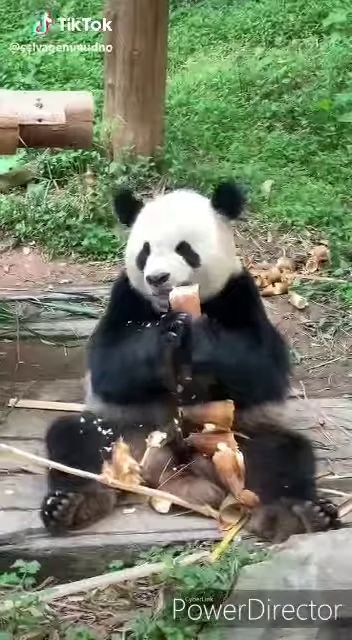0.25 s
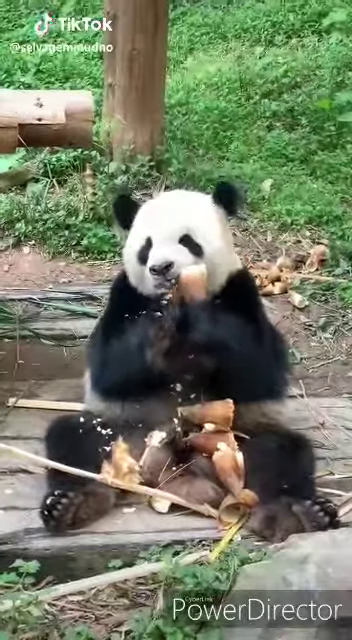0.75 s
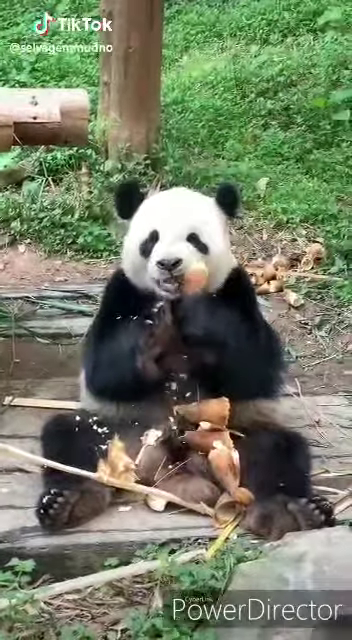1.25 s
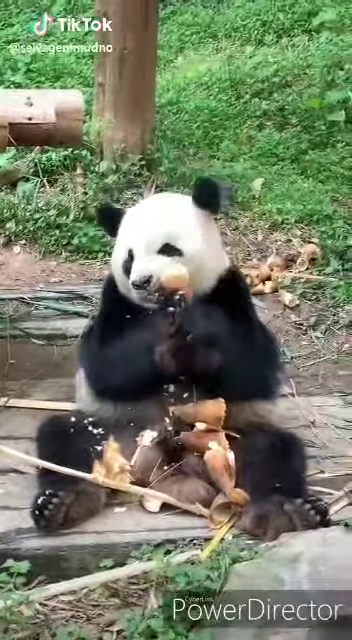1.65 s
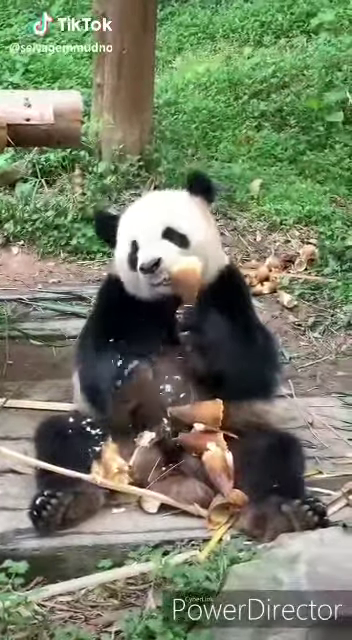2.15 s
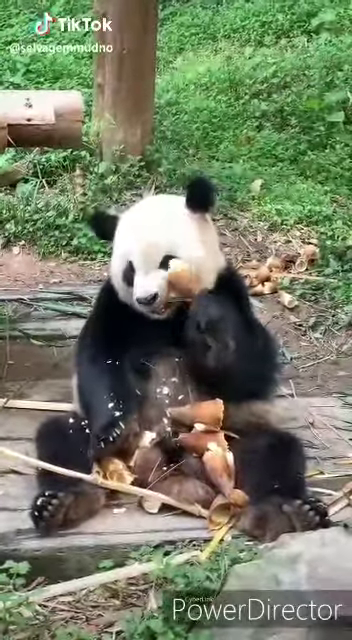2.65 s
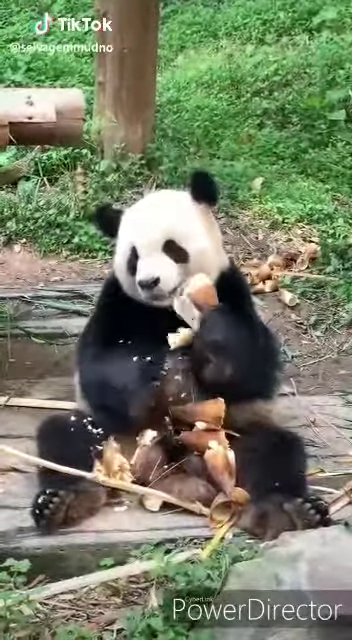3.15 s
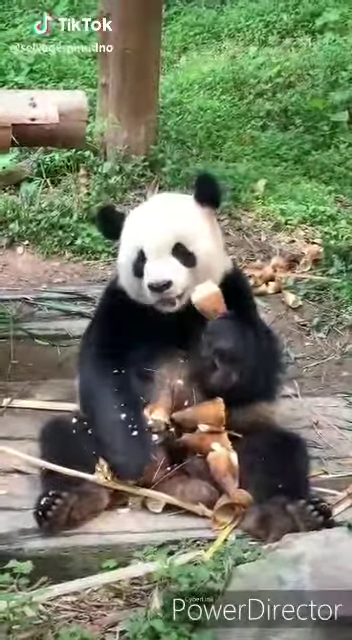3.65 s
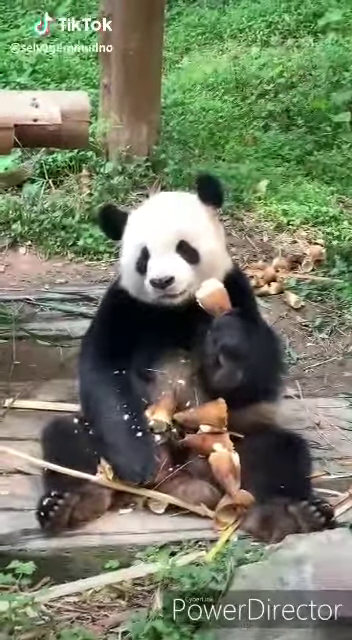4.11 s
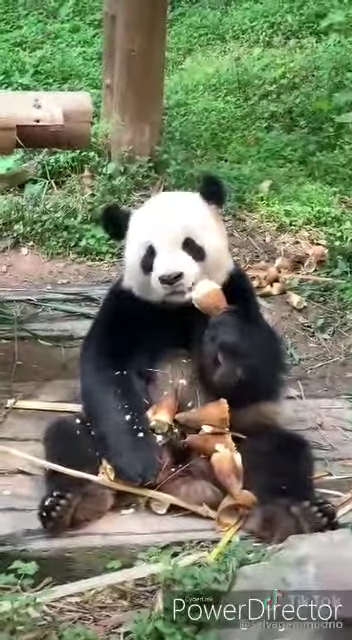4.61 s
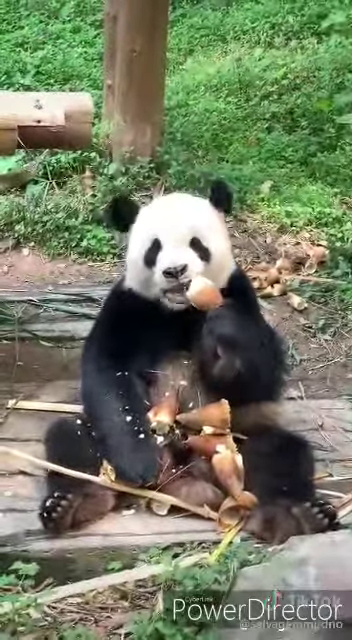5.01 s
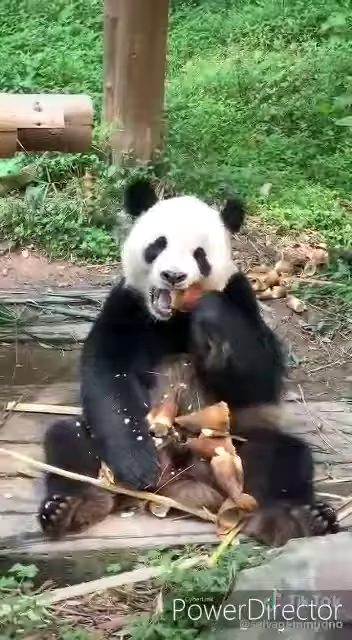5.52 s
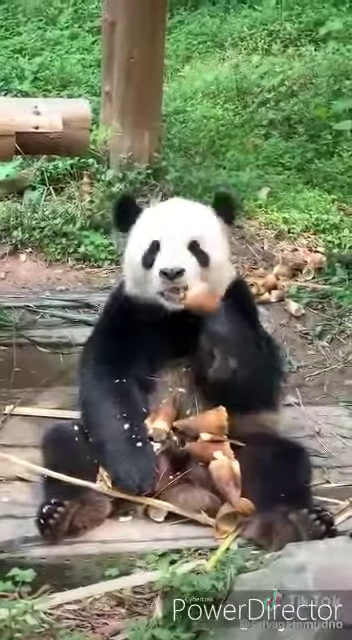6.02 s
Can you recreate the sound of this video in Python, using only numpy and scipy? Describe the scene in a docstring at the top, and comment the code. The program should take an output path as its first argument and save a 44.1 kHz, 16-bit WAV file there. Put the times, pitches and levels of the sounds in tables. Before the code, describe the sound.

Juicy, brittle chewing at about five bites a second, with sudden bright cracks, soft lip smacks and a distant low drone in open air.

```python
"""A panda on a wooden deck outdoors bites a bamboo shoot and chews, about five strokes a second.
Throughout: a far rumble of filtered noise, a wavering sine drone and a faint hiss of open air.
From the start each stroke crushes a swarm of wet fibres, and most come with a wet smack of the mouth.
Bundles snap as short ringing bursts, thickest at 0.1-0.6, 1.9-2.0 and 3.2-3.3 s.
Near 2.6 s the planks boom softly under the animal's weight.
"""
import sys
import numpy as np
from scipy import signal
from scipy.fft import rfft, irfft
from scipy.io import wavfile

SR = 44100
rng = np.random.default_rng(int(sys.argv[2]) if len(sys.argv) > 2 else 0)


def to_wav(sig):
    """Store sig (one row per channel, or 1-D mono) as 16-bit WAV at the path in sys.argv[1].

    Samples outside -1..1 are clipped; the rate is SR.
    """
    pcm = np.clip(np.atleast_2d(sig), -1, 1) * 32767
    pcm = np.round(pcm).astype(np.int16)
    wavfile.write(sys.argv[1], SR, pcm.T)  # frames by channels


N = 276490
TIME_S = np.arange(N) / SR

# Jaw strokes. Each row: start of full pressure in seconds, hold in ms, crunch level in dB,
# brightness in dB per octave, ring of thick fibres in Hz, ring of thin fibres in Hz.
JAW_STROKES = [(0.005, 125, -47, -3.5, 4000, 11100), (0.127, 41, -35, -1.5, 5570, 10500),
               (0.276, 6.1, -45, -8.5, 3640, 9800), (0.343, 48, -58, -12, 5600, 10000),
               (0.541, 31, -34.5, 0, 6100, 10500), (0.753, 42, -45, 0, 5430, 10800),
               (0.957, 1.8, -35.5, 2.5, 4700, 10300), (1.124, 7.5, -59, 3, 4300, 10900),
               (1.16, 59, -55.5, 0, 3380, 10500), (1.367, 40, -52, 5, 6040, 10200),
               (1.595, 61, -53, 0, 4600, 11800), (1.943, 31, -26.5, 2.5, 4800, 11600),
               (2.016, 12.7, -30.5, -2, 3960, 11300), (2.348, 71, -54, 4, 4940, 9900),
               (2.545, 31, -40, 2.5, 5550, 10600), (2.751, 33, -46.5, 3.5, 4800, 10400),
               (2.985, 6.8, -36, 5, 6900, 7700), (3.236, 8.8, -28, 0, 5630, 11900),
               (3.269, 8.8, -33.5, 5, 4800, 11500), (3.452, 44, -35.5, -1.5, 5260, 11600),
               (3.655, 19, -41, -0.5, 5740, 10900), (3.881, 4.8, -24.5, -1.5, 5460, 8500),
               (4.066, 46, -47, -3, 4720, 10800), (4.29, 34, -43.5, -2, 5030, 10600),
               (4.483, 12, -33.5, 6.5, 5700, 10500), (4.698, 37, -41, 3.5, 5300, 10100),
               (4.908, 15, -40.5, 12.5, 5930, 9800), (5.107, 54, -44.5, -0.5, 5060, 10000),
               (5.333, 24, -47.5, -4, 5230, 7700), (5.519, 26, -36, 1.5, 5160, 9800),
               (5.728, 26, -48.5, 5, 5140, 10600), (5.939, 22, -46.5, -2.5, 4800, 10500),
               (6.138, 55, -46, 5, 5600, 10500)]
# Snapping fibre bundles. Each row: time in seconds, snap level in dB, brightness in dB per octave, # ring of
# the bundle in Hz, knock level in dB, knock pitch in Hz. The knock is mostly the shoot's; # the dull knocks
# near 0.42-0.49 s are clacks of the teeth.
BUNDLE_SNAPS = [(0.1222, -18, 5, 11300, -24, 1500), (0.1654, -21, -2, 4500, -35, 950),
                (0.3475, -20.5, 8, 9800, -30.5, 1160), (0.387, -22, -3, 5330, -39, 1080),
                (0.4185, -25, -6, 10300, -16.5, 590), (0.4288, -29, -9, 10000, -24, 820),
                (0.4621, -29.5, -5, 4000, -30, 900), (0.488, -26.5, -15, 8800, -20.5, 1110),
                (0.5362, -12.5, 0, 11400, -28, 1030), (0.543, -15, 5, 4820, -20.5, 1290),
                (0.571, -19, 3, 6100, -38, 1000), (0.5833, -21, -1, 9400, -30, 870),
                (0.9686, -17.5, 3, 9900, -36, 940), (1.105, -37, -9, 10900, -24.5, 730),
                (1.12, -22.5, 19, 10600, -50, 800), (1.7913, -15, 0.5, 7300, -27, 1280),
                (1.9404, -3, 6, 11100, -14.5, 1150), (1.9453, -9.5, 8, 4800, -24, 880),
                (1.9536, -4, -0.5, 4370, -15, 990), (1.9653, -17, 0, 4900, -25, 890),
                (1.981, -20, 5, 11000, -23, 1020), (2.0144, -22, -2, 4400, -29, 1400),
                (2.0409, -13.5, 1, 3600, -32, 1170), (2.3474, -23, 9, 5970, -30, 1600),
                (2.6022, -18, -4.5, 5800, -30, 1130), (2.9963, -11, -1.5, 5080, -24.5, 950),
                (3.207, -8, -7, 8000, -16.5, 1340), (3.2151, -7.5, -2.5, 12500, -20, 1170),
                (3.2266, -9, -4, 7740, -21, 1010), (3.2335, -5, -4, 7500, -23, 900),
                (3.248, -8, -5, 11600, -37, 1000), (3.251, -8, 4, 5200, -8.5, 870),
                (3.281, -14.5, 3, 4800, -19, 806), (3.458, -9, 0, 11200, -20.5, 1000),
                (3.492, -21, -3, 4400, -25, 900), (3.594, -31.5, 2, 11000, -49, 900),
                (3.8806, -16.5, 9.5, 5500, -20.5, 735), (3.9024, -15, -5, 5400, -44, 940),
                (4.6937, -15, 5, 10700, -27, 1380), (4.79, -28.5, 8, 4050, -31, 700),
                (4.907, -20, 24, 10200, -44, 1000), (5.5254, -15.5, 13, 10400, -42, 1500),
                (5.724, -14, 4, 7500, -44, 800), (5.9361, -19.5, 11, 10100, -36, 1610),
                (5.9882, -16.5, -3.5, 4300, -24, 1180)]
# Wet smacks of lips and tongue. Each row: time in seconds, hold in ms, level in dB, mouth resonance in Hz.
WET_SMACKS = [(0.123, 56, -39.5, 1630), (0.343, 39, -42.5, 1160), (0.541, 65, -43, 1180),
              (0.758, 15, -37.5, 1170), (0.958, 11, -35.5, 860), (1.148, 43, -40, 824),
              (1.364, 37, -40, 870), (2.347, 42, -43.5, 880), (2.547, 60, -45.5, 1120),
              (2.765, 31, -47, 1050), (3.229, 47, -35.5, 985), (3.457, 54, -38.5, 1100),
              (3.655, 19, -37.5, 1850), (3.879, 18, -37, 1800), (4.058, 21, -36.5, 1800),
              (4.286, 45, -45.5, 1250), (4.483, 36, -35.5, 1350), (4.582, 4.5, -49, 960),
              (4.693, 15, -35.5, 1450), (4.906, 18, -37.5, 1300), (5.104, 19, -37, 1460),
              (5.319, 41, -45.5, 1670), (5.508, 41, -41, 1780), (5.719, 8, -40, 1740),
              (5.937, 16, -42, 1620), (6.145, 4.8, -32.5, 1200), (6.168, 22, -48, 1200)]
# Resonances of breaking fibres. Each row: centre in Hz, width in Hz, level in dB.
FIBRE_MODES = [(2420, 1070, -7.5), (3730, 1160, -5.5), (5160, 530, -1.5), (6500, 620, -4.5),
               (8140, 1550, 1), (10300, 1100, -4.5), (10860, 1500, 1.5), (12250, 1100, -8.5)]
# Resonances of the shoot held in the jaws. Each row: centre in Hz, width in Hz, level in dB.
SHOOT_MODES = [(573, 155, 9), (767, 185, 8), (977, 170, 2.5), (1280, 450, 7), (1980, 440, 2.5),
               (2270, 2000, 8)]
# Resonances of the shoot's hard wall. Each row: centre in Hz, width in Hz, level in dB.
WALL_MODES = [(2160, 350, 9), (3180, 2300, -5)]
# Stereo width of the eating sounds. Each row: frequency in Hz, side minus mid in dB.
EATING_WIDTH = [(400, -14), (750, -16.5), (1100, -1.5), (1900, -8), (2800, 2), (4900, -7), (7000, 0),
                (12500, -3)]
# Dull bumps of the body on the deck. Each row: time in seconds, level in dB, seconds to fall 60 dB.
DECK_BUMPS = [(2.544, -20.5, 0.5), (2.586, -40, 4), (2.639, -29, 0.5)]
# Modes of the deck. Each row: frequency in Hz, level in dB.
DECK_MODES = [(42, -9), (100, -16.5), (135, -4), (190, -25), (240, -18.5), (298, -21)]
# Level of the far drone. Each row: time in seconds, level in dB.
DRONE_LEVEL = [(0.0, -56), (0.78, -40.5), (1.55, -40), (1.83, -51), (1.99, -39), (2.86, -41), (2.88, -50),
               (3.65, -41.5), (3.98, -50), (4.33, -35.5), (4.49, -40), (4.57, -47), (4.66, -34),
               (5.15, -49), (5.57, -44.5), (5.88, -38.5), (6.02, -44), (6.27, -40.5)]
# Humps of the far rumble. Each row: centre in Hz, width in Hz, level in dB.
RUMBLE_HUMPS = [(98.4, 9.3, -44.5), (136.4, 17, -46.5), (236.1, 37, -50), (297, 15.6, -54), (436.4, 7, -57)]
# Spectral shape of the open air. Each row: frequency in Hz, relative density in dB per Hz.
AIR_SHAPE = [(20, -31), (31, -3.5), (45, -8), (75, -1.5), (130, -1), (257, -8.5), (470, -11), (800, -16.5),
             (1370, -18), (3000, -26.5), (5500, -30), (9000, -35.5), (11500, -33.5), (13000, -45.5)]
# Stereo width of the open air. Each row: frequency in Hz, side minus mid in dB.
AIR_WIDTH = [(80, -48), (170, -20.5), (370, -5), (670, -4.5), (2250, 5), (7000, 2)]

# Pulp grows with the crunch, less steeply: PULP_DB goes with a usual crunch.
PULP_DB, USUAL_CRUNCH_DB, PULP_DB_PER_DB = -39.5, -35, 0.42
# Usual stroke, ms per 20 dB; both times halve for each QUICKER_DB more crunch.
JAW_CLOSE_MS, JAW_RELEASE_MS, QUICKER_DB = 20.4, 45, 97
# Pitches sink as the jaws close and pass their nominal value at PITCH_AT_MS.
RING_SINK_OCT_PER_S, MOUTH_SINK_OCT_PER_S, PITCH_AT_MS = 9.4, 0.9, 14
SMACK_RISE_MS, SMACK_FALL_MS = 4.0, 52  # per 20 dB
STRAIN_S = 0.002  # build-up of single breaks before a tear
NEAR_DB, NEAR_T60_S = -8.0, 0.018  # close reflections: weak and brief
DRONE_HZ = 58.13
AIR_DB = -38.5
CUTOFF_HZ = 13000


def chewing(ring_db=-4.0, ring_width_hz=700, ring_db_per_bright=-0.96, ring_lag_ms=5,
            thin_db=-4.0, thin_width_hz=1300, thin_db_per_bright=0.6, crisp_db=1.5):
    """Strokes crush fibres: crisp swarm, high thin ring, sinking thick ring, dull pulp. Hard is quicker."""
    out = np.zeros((2, N))
    ms = np.arange(-SR // 10, SR // 4) * 1000 / SR
    size = len(ms)
    for start_s, hold_ms, level_db, bright, thick_hz, thin_hz in JAW_STROKES:
        effort_db = level_db - USUAL_CRUNCH_DB
        slowness = 2 ** (-effort_db / QUICKER_DB)
        force = pressure(ms, JAW_CLOSE_MS * slowness, hold_ms, JAW_RELEASE_MS * slowness)

        crisp_push = force * fractures(size, per_s=830, spread_db=2.0, clump_db=2.0)
        modes = FIBRE_MODES + strands(level_db=-3.0, width_hz=58)
        crisp = body(crisp_push, modes, bright, scatter=0.061)

        thin_push = force * fractures(size, per_s=980, spread_db=1.5, clump_db=6.5)
        thin = body(thin_push, [(thin_hz, thin_width_hz, 0)], scatter=0.011)

        late_force = np.interp(ms - ring_lag_ms, ms, force)
        thick_push = late_force * fractures(size, per_s=930, spread_db=2.0, clump_db=3.5)
        thick = sinking(thick_push, ms, thick_hz, RING_SINK_OCT_PER_S, ring_width_hz)

        fibres = from_db(crisp_db) * crisp
        fibres = fibres + from_db(thin_db + thin_db_per_bright * bright) * thin
        fibres = fibres + from_db(ring_db + ring_db_per_bright * bright) * thick
        fibres = scattered(fibres, NEAR_DB, NEAR_T60_S)

        pulp_push = force * fractures(size, per_s=1000, spread_db=2.5, clump_db=1.5)
        pulp = body(pulp_push, SHOOT_MODES, scatter=0.13)
        pulp_db = PULP_DB + PULP_DB_PER_DB * effort_db
        add(out, start_s + ms[0] / 1000, from_db(level_db) * fibres + from_db(pulp_db) * pulp)
    return out


def cracking(snap_s=0.0003, give_s=0.00018, knock_s=0.00087, clack_s=0.00046, crisp_db=-2.5,
             ring_db=-2.5, ring_width_hz=1300, splinter_db=-15.0, splinter_s=0.0057,
             knock_width_hz=330, overtone_ratio=1.38, overtone_db=-12.5, clack_db=-6.5):
    """Single fibres give, the bundle tears and rings; shoot knocks, wall clacks, splinters follow."""
    out = np.zeros((2, N))
    t = np.arange(-SR // 100, SR // 25) / SR
    before, after = np.maximum(-t, 0), np.maximum(t, 0)
    for snap_at_s, level_db, bright, ring_hz, knock_db, knock_hz in BUNDLE_SNAPS:
        splinter_swell = np.exp(-before / STRAIN_S - after / splinter_s)
        splinters = splinter_swell * fractures(len(t), per_s=1400, spread_db=2.5, clump_db=7.0)
        tear = np.exp(-before / give_s - after / snap_s) + from_db(splinter_db) * splinters
        crisp = body(tear, FIBRE_MODES, bright, scatter=0.055)
        ring = body(tear, [(ring_hz, ring_width_hz, 0)], scatter=0.009)
        snap = from_db(crisp_db) * crisp + from_db(ring_db) * ring

        overtone = (overtone_ratio * knock_hz, knock_width_hz, overtone_db)
        knock_push = (t >= 0) * np.exp(-after / knock_s)
        knock = body(knock_push, [(knock_hz, knock_width_hz, 0), overtone])
        clack = body((t >= 0) * np.exp(-after / clack_s), WALL_MODES, scatter=0.029)

        crack = from_db(level_db) * snap + from_db(knock_db) * (knock + from_db(clack_db) * clack)
        add(out, snap_at_s + t[0], scattered(crack, NEAR_DB, NEAR_T60_S))
    return out


def smacking(mouth_db=-2.0, mouth_width_hz=290, throat_hz=740, throat_width_hz=330,
             throat_db=-8.0, soft_hz=2700, parting_db=4.5, parting_ms=3.1):
    """Lips and tongue part; bursting saliva films ring the closing mouth and the cavity behind it."""
    out = np.zeros((2, N))
    ms = np.arange(-SR // 50, SR // 4) * 1000 / SR
    parting = from_db(parting_db) * (ms >= 0) * np.exp(-np.abs(ms) / parting_ms)
    for start_s, hold_ms, level_db, mouth_hz in WET_SMACKS:
        opening = pressure(ms, SMACK_RISE_MS, hold_ms, SMACK_FALL_MS)
        pops = parting + opening * fractures(len(ms), per_s=650, spread_db=1.0, clump_db=3.0)
        mouth = sinking(pops, ms, mouth_hz, MOUTH_SINK_OCT_PER_S, mouth_width_hz)
        throat = body(pops, [(throat_hz, throat_width_hz, 0)], scatter=0.13)
        smack = from_db(mouth_db) * mouth + from_db(throat_db) * throat
        add(out, start_s + ms[0] / 1000, from_db(level_db) * smack)
    # soft flesh absorbs the treble
    return signal.sosfilt(signal.butter(6, soft_hz, fs=SR, output="sos"), out)


def pressure(ms, rise_ms, hold_ms, fall_ms):
    """Force rises, holds and lets go exponentially; rise and fall are per 20 dB."""
    rising = np.maximum(-ms, 0) / max(rise_ms, 2)
    falling = np.maximum(ms - max(hold_ms, 0), 0) / max(fall_ms, 10)
    return from_db(-20 * (rising + falling))


def fractures(size, per_s, spread_db, clump_db):
    """A clumped swarm of tiny breaks of uneven size, rms 1."""
    uneven_db = spread_db * np.minimum(rng.exponential(1, size), 4)
    sizes = from_db(uneven_db + clump_db * drift(210.4, size))
    return rms_one(sizes * (rng.random(size) < per_s / SR))


def strands(level_db, width_hz, count=8):
    """Taut strands, new in every stroke, ring at narrow pitches of their own."""
    return [(hz, width_hz, level_db) for hz in rng.uniform(4498, 11800, count)]


def body(push, modes, bright=0, scatter=0.043):
    """Impulses strike every mode with random strength per side; mode pitches scatter. Energy is kept."""
    out = 0
    for hz, width_hz, level_db in modes:
        centre_hz = min(hz * np.exp(scatter * rng.standard_normal()), .45 * SR)
        strikes = push * rng.standard_normal((2, len(push)))
        rung = resonate(resonate(strikes, centre_hz, width_hz), centre_hz, 3 * width_hz)
        tilt_db = bright * np.log2(hz / modes[0][0])
        out = out + rms_one(rung) * from_db(level_db + tilt_db)
    return rms_one(out) * np.sqrt(np.mean(push ** 2))


def sinking(push, ms, hz, octaves_per_s, width_hz):
    """Impulses ring a resonance whose pitch sinks through the stroke. Energy is kept."""
    pitch_hz = hz * 2 ** (-octaves_per_s * (np.clip(ms, 0, 80) - PITCH_AT_MS) / 1000)
    # filter at 0 Hz in a frame turning with the pitch
    turn = np.exp(2j * np.pi * np.cumsum(pitch_hz) / SR)
    poles = np.poly(np.exp(-np.pi * width_hz * np.array([1, 2]) / SR))
    strikes = push * rng.standard_normal((2, len(push)))
    rung = signal.lfilter([1], poles, strikes / turn + 1e-18) * turn
    return rms_one(rung.real) * np.sqrt(np.mean(push ** 2))


def resonate(x, hz, width_hz):
    """A two-pole resonance with gain 1 on top."""
    r = np.exp(-np.pi * width_hz / SR)
    zeros = np.array([1, 0, -1]) * (1 - r * r) / 2
    poles = [1, -2 * r * np.cos(2 * np.pi * hz / SR), r * r]
    return signal.lfilter(zeros, poles, x + 1e-18)


def scattered(sound, near_db, t60_s):
    """Paws and deck add close reflections, drawn anew per side and per sound."""
    near = np.array([echoes(side, t60_s, delay_s=0.001)[:len(side)] for side in sound])
    return sound + from_db(near_db) * near


def echoes(x, t60_s, delay_s):
    """Dense reflections that die away, with the energy of the sound itself."""
    t = np.arange(int(t60_s * SR) + 2) / SR
    tail = rng.standard_normal(len(t)) * from_db(-60 * t / t60_s)
    response = np.concatenate([np.zeros(int(delay_s * SR)), tail / np.linalg.norm(tail)])
    return signal.fftconvolve(x, response)[:N]


def enclosure(x, far_db=-17.5):
    """The yard adds a faint tail; stereo width varies by band."""
    tail = np.array([echoes(side, t60_s=0.25, delay_s=0.011) for side in x])
    left, right = x + from_db(far_db) * tail
    return widened(rfft(left + right), rfft(left - right), EATING_WIDTH) / np.sqrt(2)


def widened(mid, side, width_table):
    """Mid and side spectra to left and right, in the width table's proportion."""
    width = from_db(at_hz(width_table, np.arange(N // 2 + 1) * SR / N))
    return irfft((mid + width * side * [[1], [-1]]) / np.hypot(1, width), N)


def deck(width_hz=14):
    """Noise rings the plank modes: soft, rough booms as the animal shifts its weight."""
    out = np.zeros((2, N))
    t = np.arange(SR // 2) / SR
    for start_s, level_db, t60_s in DECK_BUMPS:
        push = rng.standard_normal(2 * len(t))
        boom = 0
        for hz, mode_db in DECK_MODES:
            rung = resonate(resonate(push, hz, width_hz), hz, 2 * width_hz)
            boom = boom + from_db(mode_db) * rms_one(rung[len(t):])  # skip the filter's build-up
        swell = 1 - np.exp(-t / 0.013)
        add(out, start_s, boom[None] * from_db(level_db - 60 * t / t60_s) * swell)
    return out


def far_rumble(waver_hz=0.63):
    """A distant machine drones as a wavering sine among humps of low noise."""
    level = from_db(np.interp(TIME_S, *np.transpose(DRONE_LEVEL)))
    pitch_hz = DRONE_HZ + waver_hz * drift(6.14)
    drone = np.sqrt(2) * np.sin(2 * np.pi * np.cumsum(pitch_hz) / SR)
    humps = 0
    for hz, width_hz, hump_db in RUMBLE_HUMPS:
        noise = resonate(resonate(rng.standard_normal(N), hz, width_hz), hz, 2 * width_hz)
        humps = humps + from_db(hump_db) * rms_one(noise)
    return level * drone + humps


def open_air(flutter_db=2.0):
    """Diffuse noise of drifting level, alike on both sides only in the bass."""
    hz = np.arange(N // 2 + 1) * SR / N
    mid, side = rfft(rng.standard_normal((2, N))) * from_db(at_hz(AIR_SHAPE, hz))
    air = widened(mid, side, AIR_WIDTH)
    return from_db(AIR_DB + flutter_db * drift(16)) * rms_one(air)


def drift(rate_hz, size=N):
    """Slow chance with spread about 1: random points joined by lines."""
    steps = np.arange(size) * rate_hz / SR
    count = int(steps[-1]) + 2
    return np.interp(steps, np.arange(count), rng.standard_normal(count))


def from_db(db):
    """Decibels to gain."""
    return 10 ** (np.asarray(db) / 20)


def rms_one(x):
    """Scale to rms 1."""
    return x / np.sqrt(np.mean(x ** 2) + 1e-20)


def at_hz(points, hz):
    """Read a table on a log-frequency axis."""
    table_hz, values = np.array(points).T
    return np.interp(np.log(np.maximum(hz, 1)), np.log(table_hz), values)


def add(out, start_s, sound):
    """Mix a stereo sound in at start_s, cut to the scene's bounds."""
    start = round(start_s * SR)
    sound = sound[:, max(-start, 0):N - start]
    first = max(start, 0)
    out[:, first:first + sound.shape[1]] += sound


def scene():
    """The eating animal in front of the background."""
    eating = enclosure(chewing() + smacking() + cracking())
    return eating + deck() + far_rumble() + open_air()


def record(dry):
    """The top is cut steeply."""
    return signal.sosfilt(signal.butter(20, CUTOFF_HZ, fs=SR, output="sos"), dry)


dry = scene()
out = record(dry)
to_wav(out)
```